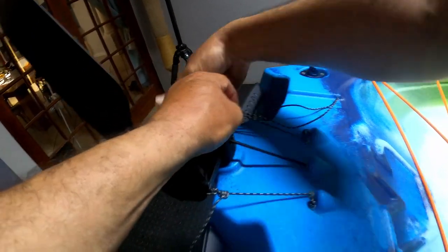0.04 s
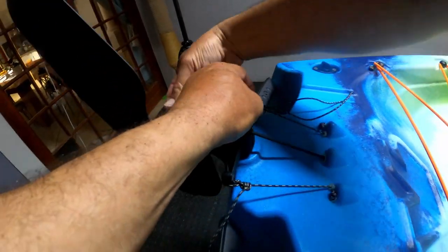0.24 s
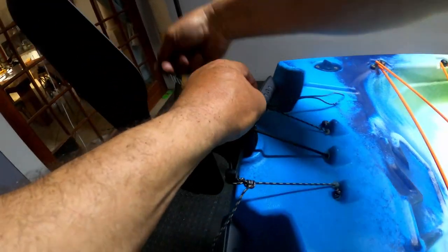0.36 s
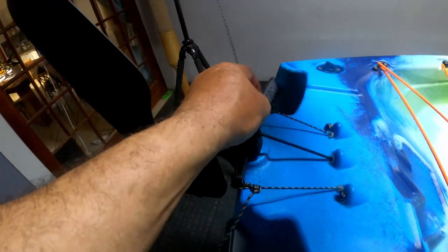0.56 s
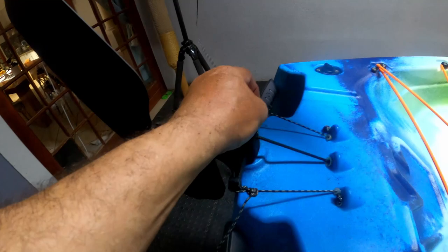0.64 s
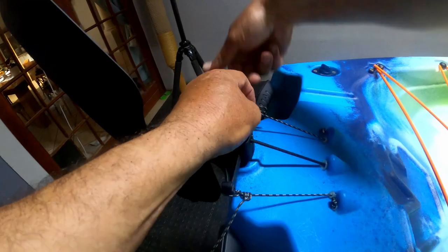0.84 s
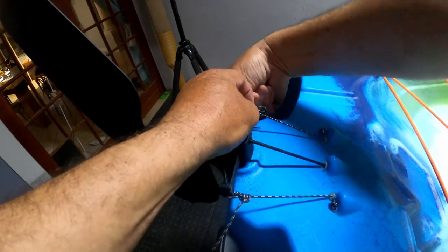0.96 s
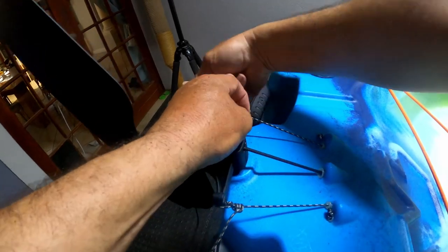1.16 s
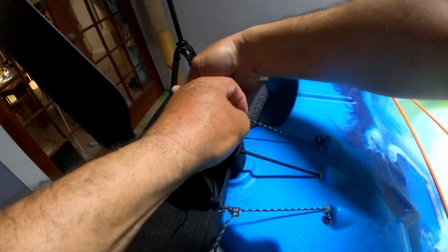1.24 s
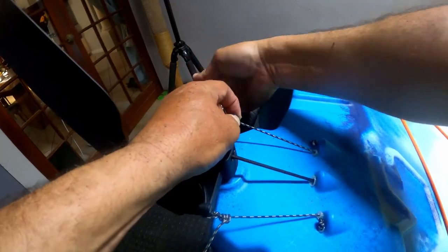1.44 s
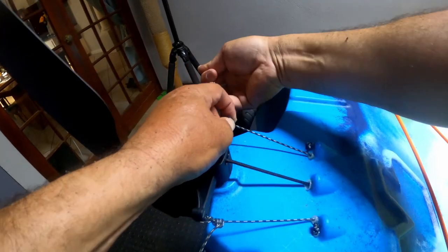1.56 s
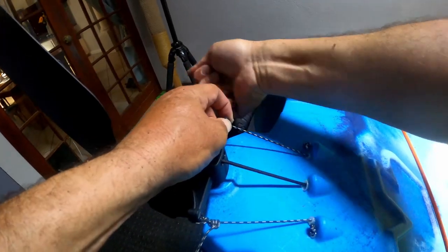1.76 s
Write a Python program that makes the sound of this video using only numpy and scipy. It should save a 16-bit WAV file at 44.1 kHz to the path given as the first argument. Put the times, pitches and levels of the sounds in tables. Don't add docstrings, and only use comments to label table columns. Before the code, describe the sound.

A braided cord zips through a plastic eyelet, slaps once, then snaps tight against a hollow shell.

```python
import sys
import numpy as np
from scipy import signal
from scipy.fft import rfft, irfft
from scipy.io import wavfile
from scipy.ndimage import uniform_filter1d

SR = 44100
rng = np.random.default_rng(int(sys.argv[2]) if len(sys.argv) > 2 else 0)


def to_wav(sig):
    pcm = np.clip(np.atleast_2d(sig), -1, 1) * 32767
    pcm = np.round(pcm).astype(np.int16)
    wavfile.write(sys.argv[1], SR, pcm.T)


def boost(x):
    u = np.asarray(x, float) / 20
    return 10 ** u


N = 79380
T = np.arange(N) / SR
F = np.arange(N // 2 + 1) * SR / N

# (time [s], hold [s], level [dB], fade T60 [s], push corner, low is dull [Hz])
SHOVES = [(.0, 0.021, -57.5, 0.21, 25.4), (0.195, 0.051, -39, 0.36, 335), (0.322, 0.032, -49, 0.084, 50),
          (0.771, 0.042, -58.5, 0.098, 49.3), (0.993, 0.0074, -29, 0.15, 747),
          (1.012, 0.043, -37, 0.5, 487), (1.179, 0.044, -44, 0.33, 830), (1.242, 0.063, -52.5, 0.23, 218),
          (1.457, 0.016, -65, 0.59, 603), (1.523, 0.043, -70.5, 0.27, 497),
          (1.729, 0.044, -59.5, 0.22, 614)]
# (frequency [Hz], level [dB], T60 [s])
SHELL_MODES = [(92, 1, 0.26), (139, -3, 0.22), (205, -1, 0.088), (271.6, -5, 0.051), (380.4, 3.5, 0.031),
               (521.3, -2, 0.041), (699.5, -5.5, 0.048), (803, 0, 0.03), (1090, -2.5, 0.023),
               (1327, 0, 0.022), (1414, -13.5, 0.021), (1710, -4, 0.02), (1910, -2, 0.019)]
# (time [s], hold [s], level [dB], fade T60 [s], top of the band [Hz])
RUBS = [(0.188, 0.009, -63, 1, 8500), (0.206, 0.006, -50, 0.036, 4170), (0.234, 0.0095, -56, 0.047, 3430),
        (0.259, 0.0046, -45.5, 0.0068, 4600), (0.264, 0.0084, -38, 0.039, 13100),
        (0.281, 0.013, -50, 0.39, 11600), (0.386, 0.0054, -72, 0.051, 11000),
        (0.98, 0.022, -49, 0.42, 6500), (1.111, 0.059, -55.5, 0.31, 11700),
        (1.399, 0.036, -66.5, 0.22, 4100), (1.495, 0.026, -65, 0.2, 12500),
        (1.723, 0.015, -69.5, 0.3, 6040)]
# (frequency [Hz], density [dB per Hz])
RUB_SPECTRUM = [(600, -24), (1300, -5.5), (2100, -9.5), (2900, -1), (4600, -4), (6000, -5.5), (9000, -15.5),
                (15300, -36.5)]
# (time [s], length [s], frequency [Hz], level [dB])
SQUEAKS = [
    (.84, .08, 4650, -74),
    (1.13, .05, 5800, -67),
    (1.11, .05, 4600, -68),
    (1.176, .04, 725, -47.5),
    (1.176, .035, 1520, -57),
    (1.27, .035, 6700, -76),
    (1.29, .08, 5400, -76),
    (1.435, .04, 3650, -75),
    (1.425, .03, 1330, -71),
    (1.5, .04, 1600, -73),
]
# (time [s], peak level [dB], pitch [Hz])
KNOCKS = [(0.203, -41, 149), (0.211, -33, 347), (.224, -30.5, 106), (0.237, -43, 92), (.247, -35, 192),
          (.257, -39, 330), (.268, -30, 111), (.29, -35, 81.6), (0.329, -43, 65), (.35, -42, 55),
          (.404, -42.5, 320), (1.002, -29, 500), (1.004, -36, 76.4), (1.021, -26.5, 152), (1.045, -39, 205),
          (1.067, -28.5, 134), (1.088, -31.5, 102), (1.11, -36, 143), (1.122, -42, 120), (1.169, -48, 176),
          (1.201, -37, 253), (1.244, -41, 360), (1.287, -41.5, 205), (1.303, -44.5, 214),
          (1.321, -49.5, 95.4), (1.375, -55, 70), (1.466, -49.5, 203), (1.528, -47.5, 206),
          (1.556, -45.5, 205), (1.58, -47, 237), (1.604, -49, 320), (1.648, -64, 177), (1.736, -58, 174),
          (1.76, -54.5, 163), (1.78, -53, 190)]
# (time [s], ridge rate [Hz], rim tone [dB], grit in the shell [dB], fibre rasp [dB])
CORD_RUN = [
    (.39, 328.1, -57, -71, -53.5),
    (.436, 800.6, -54.5, -49.5, -55),
    (.457, 1245, -44, -55.5, -45.5),
    (.495, 1779, -43, -55, -50.5),
    (0.544, 1861, -37, -47, -40),
    (.607, 1805, -36, -45.5, -43.5),
    (.632, 1083, -32, -46, -41.5),
    (.678, 481, -51.5, -44.5, -57),
    (.72, 301, -64, -50.5, -66.5),
]
# (frequency [Hz], level [dB], T60 [s])
RIM_MODES = [(2850, 2, .014), (3620, -2, .012), (4290, -1, .007), (4680, -1, .01), (5650, -5, .007)]
# (frequency [Hz], density [dB per Hz])
RASP_SPECTRUM = [(1500, 0), (2400, -35), (2900, 8), (4500, -4), (6000, 2), (6900, -14.5), (9400, -13.5),
                 (15300, -33)]
# (frequency [Hz], level [dB], T60 [s])
SLAP_MODES = [(940, 16, 0.0012), (1420, -13, 0.015), (2340, -8, 0.0015), (3190, 1, 0.0029),
              (6150, 4.5, 0.002), (10000, -47, 0.0022), (13900, -42, .002)]
# (frequency [Hz], level [dB], T60 [s])
THUD_MODES = [
    (275, 0, .042),
]
# (frequency [Hz], density [dB per Hz])
CRACK_SPECTRUM = [(530, 6), (900, -10), (2480, -1.5), (3940, -12), (4880, -3.5), (9070, -21.5),
                  (15500, -45)]
# (frequency [Hz], density [dB per Hz])
ROOM_TONE_SPECTRUM = [(25, 1), (100, -37), (165, 3), (400, -8.5), (1000, -20), (2800, -29), (5600, -31),
                      (15300, -53)]
# (frequency [Hz], lead of the left [rad])
PORT_PHASE = [(0, -.2), (250, -.5), (860, -.85), (2000, -1), (4500, -1.1), (6000, -1.8), (15000, -2)]
# (frequency [Hz], left minus right [dB])
PORT_BALANCE = [(60, 2.3), (300, 0), (1000, .4), (2500, 2.4), (5000, 2.2), (8000, -4), (15000, -5.5)]


def level(x, db=0):
    return x * boost(db) / np.sqrt(np.mean(x ** 2))


def peak(x):
    return x / np.abs(x).max()


def noise():
    return rng.standard_normal(N)


def read(table):
    hz, value = np.array(table).T
    return np.interp(np.log(F + 20), np.log(hz + 20), value)


def colour(x, spectrum):
    return level(irfft(rfft(x) * boost(read(spectrum)), N))


def cut(x, hz, kind, order=2):
    return signal.sosfilt(signal.butter(order, hz, kind, fs=SR, output="sos"), x)


def ring(x, modes, turn=1):
    out = 0
    for k, (hz, db, t60) in enumerate(modes):
        pole = np.exp(2j * np.pi * hz / SR - np.log(1000) / (abs(t60) * SR))
        out = out + turn ** k * boost(db) * signal.lfilter([1], [1, -pole], x + 0j).imag
    return out


def shape(start, rise, hold, t60):
    t = T - start
    return np.clip(t / rise, 0, 1) * boost(-60 * np.clip(t - rise - hold, 0, 2) / t60)


def tap(time_s, width_s):
    return np.exp(-.5 * ((T - time_s) / width_s) ** 2)


def walk(rate):
    k = max(int(SR / rate), 2)
    steps = np.repeat(rng.standard_normal(N // k + 1), k)
    return 1.315 * uniform_filter1d(uniform_filter1d(steps, k), k)[:N]


def grains(rate, scatter_db):
    struck = rng.random(N) < rate / SR
    return struck * np.sign(noise()) * boost(scatter_db * rng.exponential(size=N))


def spread(x):
    return x + .45 * rng.standard_normal((2, N))


def room_tone():
    shared = colour(noise(), ROOM_TONE_SPECTRUM) * boost(1.1 * walk(22.6))
    own = [cut(colour(noise(), ROOM_TONE_SPECTRUM), 380, "high", order=1) for _ in range(2)]
    return level(shared + 0.29 * np.array(own), -59)


def shell_shoves():
    bumps_per_s, scatter_db, rise_s = 900, 1.2, .005
    bumps = cut(grains(bumps_per_s, scatter_db) + 0.079 * noise(), 1430, "low")
    out = 0
    for s, hold, db, t60, hz in SHOVES:
        push = cut(bumps, hz, "low", order=1)
        boom = level(cut(ring(push, SHELL_MODES), max(72, hz / 3), "high"))
        direct = level(cut(push, max(18, hz / 4), "high"), -9)
        out = out + level(boom + direct) * boost(db) * shape(s, rise_s, hold, t60)
    return out


def finger_rubs():
    fibres = spread(level(grains(14000, 2)))
    rim = cut(cut(ring(fibres, RIM_MODES, turn=-0.58), 2200, "high"), 6200, "low")
    scuff = (colour(fibres, RUB_SPECTRUM) + level(rim, -34.0))
    scuff = scuff * boost(0.43 * walk(91))
    out = 0
    for s, hold, db, t60, hz in RUBS:
        rise = 0.82 * hold
        out = out + level(cut(scuff, hz, "low"), db) * shape(s, rise, hold, t60)
    return out


def sleeve():
    airy = cut(cut(noise(), 4200, "high", order=4), 5300, "low", order=4)
    return level(airy, -73) * shape(1.4, 0.053, 0.23, .3)


def squeaks():
    out = 0
    for s, length, hz, db in SQUEAKS:
        width_hz = 25 + .04 * hz
        thin = ring(noise(), [(hz, 0, 2.9 / width_hz)])
        thin = level(cut(thin, 0.78 * hz, "high"), db)
        out = out + thin * boost(4.5 * walk(50)) * shape(s, .02, length, .14)
    return out


def knocks():
    out = 0
    for s, db, hz in KNOCKS:
        t60 = 9 / hz
        push = np.exp(-.5 * ((T - s) * hz * 9.5) ** 2)
        panel = ring(push, [(hz, 0, t60), (1.23 * hz, -5, t60 / 2)])
        out = out + boost(db) * peak(cut(panel, hz / 3, "high"))
    return out


def ridges(ratio):
    time_s, hz = np.array(CORD_RUN).T[:2]
    rate = ratio * np.interp(T, time_s, hz) * (1 + .085 * walk(700))
    return np.exp(1.8 * np.cos(2 * np.pi * np.cumsum(rate) / SR))


def cord():
    time_s, _, tone_db, grit_db, rasp_db = np.array(CORD_RUN).T
    running = np.clip((T - time_s[0]) / 0.017, 0, 1)
    running = running * boost(-60 * np.clip(T - time_s[-1], 0, 2) / 0.36)

    spurt = 1 + .24 * tap(.567, .011)
    strand, other = ridges(spurt), ridges(1.02)
    knock = 0
    for bumps, db in ((strand, 0), (other, 1.5)):
        knock = knock + boost(db + 5 * walk(150)) * (bumps - bumps.mean())
    knock = cut(knock, 457, "high")

    flat = [(hz, 0, 1.02 * t60) for hz, _, t60 in SHELL_MODES[3:]]
    rim = cut(ring(knock, RIM_MODES[1:], turn=-1.8), 2100, "high", order=4)
    tone = level(level(knock) + level(ring(knock, flat), -0.5) + level(rim, -19))
    grit = level(cut(ring(grains(4000, 3.05), flat), 237, "high"), 2)

    fibres = spread(noise()) * strand ** 0.71 * boost(1.1 * walk(149.5) + 2 * walk(41.37))
    edge = cut(cut(ring(fibres, RIM_MODES, turn=-1), 2400, "high"), 7000, "low")
    rasp = level(colour(fibres, RASP_SPECTRUM) + level(edge, -1.5))

    def fader(db):
        return boost(np.interp(T, time_s, db))

    return running * (tone * fader(tone_db) + grit * fader(grit_db) + rasp * fader(rasp_db))


def slap():
    slap_s, bounce_s = .7686, .00115
    land = tap(slap_s + bounce_s, 4e-5)
    contact = tap(slap_s, 1.6e-5) + boost(-4) * peak(land) / 2
    tick = peak(cut(ring(contact, SLAP_MODES), 255, "high"))
    thin = cut(tick, 1050, "high")
    ticks = cut(np.array([thin, 2 * tick - thin]), 9000, "low")
    thud = peak(cut(ring(land, THUD_MODES), 71, "high"))
    thuds = boost(-10.5 + np.array([[-11], [5]])) * thud
    return (ticks + thuds) * boost(-18.5)


def jerk():
    crack = colour(noise(), CRACK_SPECTRUM) * shape(.9916, .0003, .002, .012)
    damped = [(hz, 0, .5 * t60) for hz, _, t60 in SHELL_MODES[1:9]]
    blow = peak(cut(ring(tap(.9936, .00025), damped), 140, "high"))
    return crack * boost(-29) - blow * boost(-24)


def tail(t60, db):
    t = T[:SR // 3]
    return level(rng.standard_normal((2, len(t))) * boost(-60 * t / t60), db) / np.sqrt(len(t))


def space(x, near_db):
    room = cut(cut(tail(0.66, -14), 2550, "low", order=1), 200, "high", order=1)
    near = cut(tail(.02, near_db), 2200, "high", order=1)
    return x + signal.fftconvolve(np.atleast_2d(x), room + near, axes=1)[:, :N]


def scene():
    rub_near_db, hit_near_db = -6, -11
    body = space(shell_shoves() + knocks(), rub_near_db)
    rubbing = space(finger_rubs() + sleeve() + squeaks() + cord(), rub_near_db)
    impacts = space(slap() + jerk(), hit_near_db)
    return room_tone() + body + rubbing + impacts


def band_limit(x):
    return signal.sosfilt(signal.butter(12, 15500, fs=SR, output="sos"), x)


def record(dry):
    notch_hz, notch_width_hz, notch_db, top_hz = 116, 15, -12, 15350
    half = boost(read(PORT_BALANCE) / 2) * np.exp(.5j * read(PORT_PHASE))
    dip = 1 - (1 - boost(notch_db)) / (1 + 2j * (F - notch_hz) / notch_width_hz)
    ports = irfft(rfft(dry) * dip * np.array([half, 1 / half]), N)
    ports = signal.sosfilt(signal.ellip(8, .2, 60, top_hz, fs=SR, output="sos"), ports)
    return band_limit(ports)


dry = scene()
out = record(dry)
to_wav(out)
```